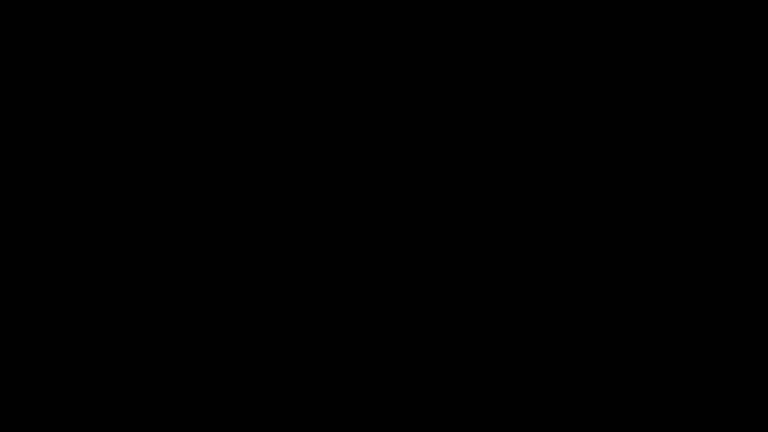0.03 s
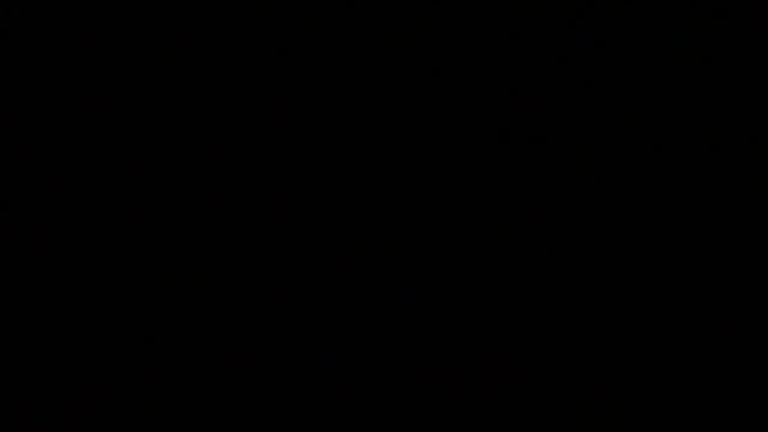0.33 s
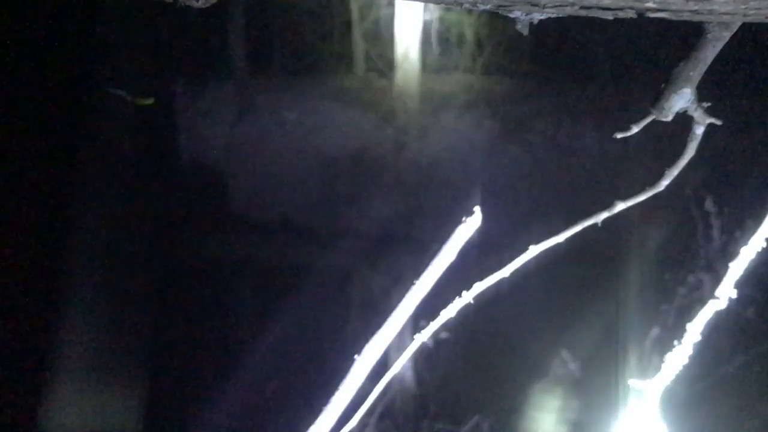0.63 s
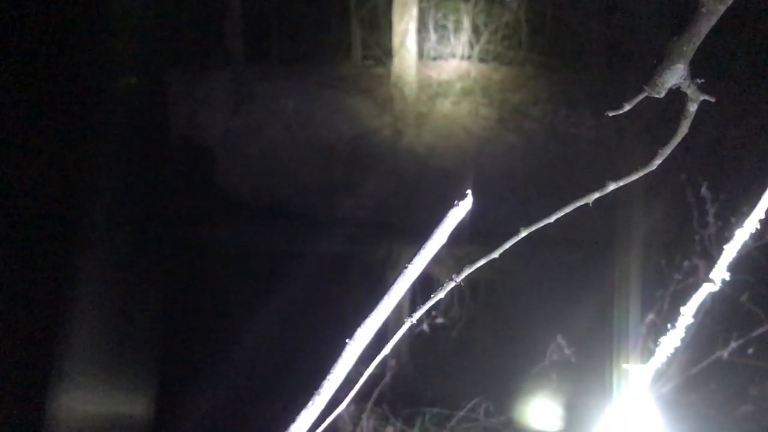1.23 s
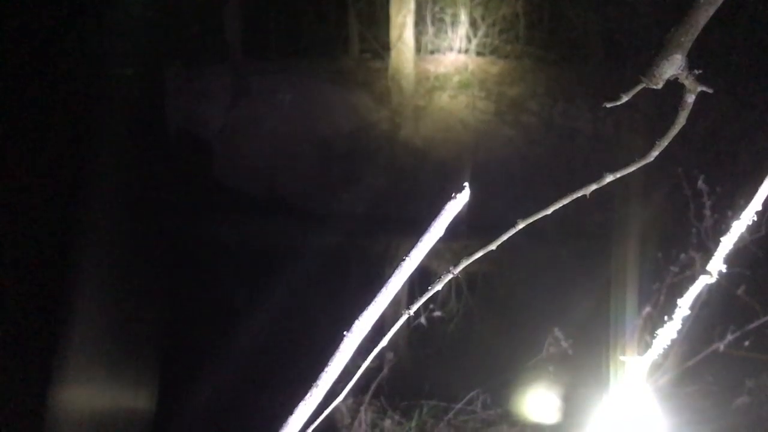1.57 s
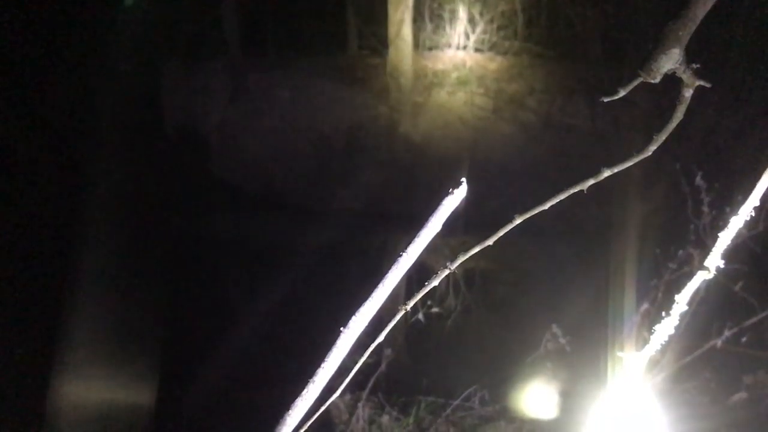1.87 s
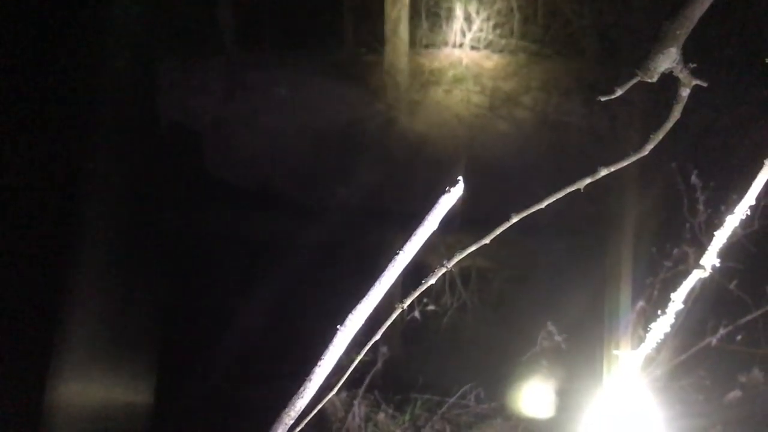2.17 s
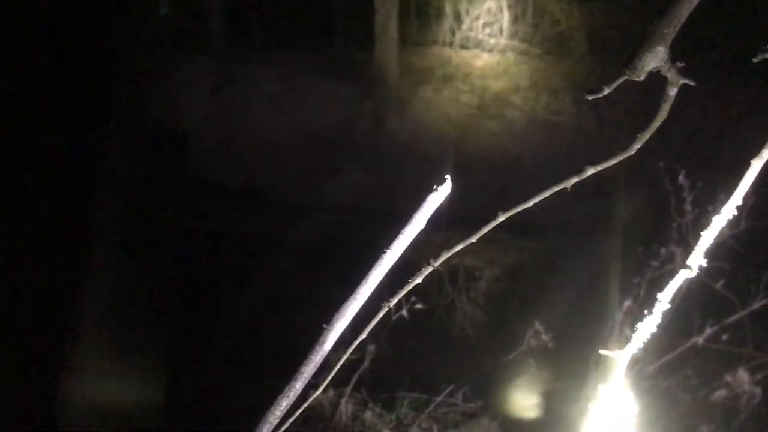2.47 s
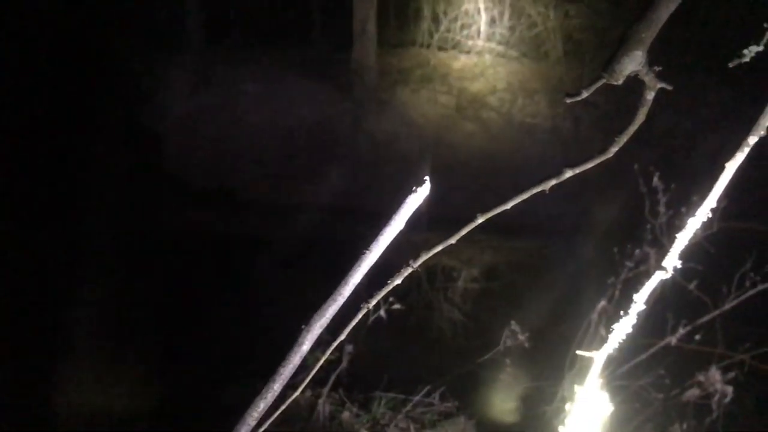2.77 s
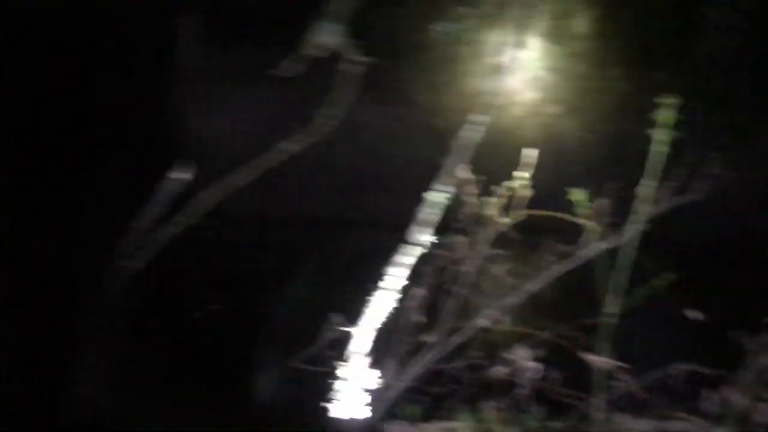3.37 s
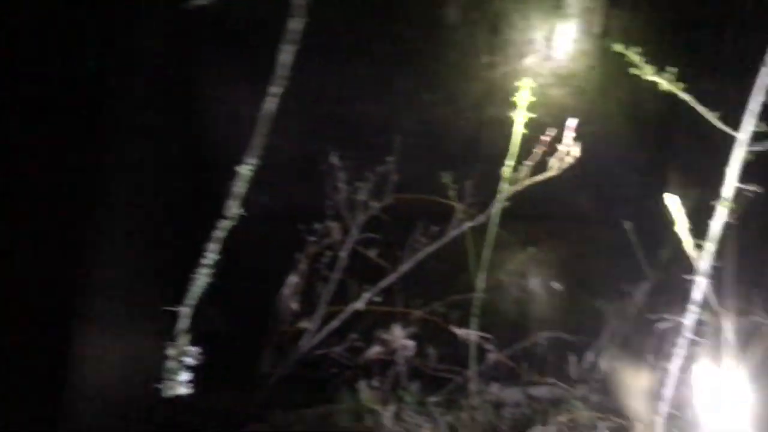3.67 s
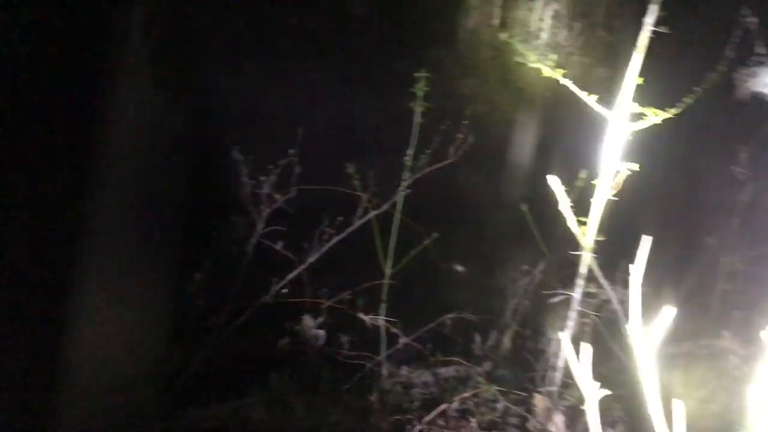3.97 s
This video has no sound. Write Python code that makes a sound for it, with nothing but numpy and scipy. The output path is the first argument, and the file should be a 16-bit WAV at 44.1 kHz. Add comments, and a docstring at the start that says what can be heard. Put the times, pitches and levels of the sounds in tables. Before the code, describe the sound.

A quick burst of high, raspy coyote yips and a cracking howl rings on among the trees at night. Then soft bumps, leaf rustles and small twig snaps sound close to the microphone, above a quiet low rumble.

```python
"""A wood at night, over low rumble and faint hiss. Coyotes open with a high yip, a whimper and a
falling yelp, as one thump and one twig sound close by. A bark follows, then a breaking howl with a
low whine under it and a thin whistle on top. Each voice is a gliding pitch with raspy overtones
shaped by the throat, and rings on among the trees for two seconds. As the echo fades, someone moves
near the microphone: rustling brush, snapping twigs, soft thumps and scuffs."""
import sys
import numpy as np
from scipy import signal
from scipy.fft import rfft, irfft
from scipy.io import wavfile

SR = 44100
rng = np.random.default_rng(int(sys.argv[2]) if len(sys.argv) > 2 else 0)


def bounce(signal):
    """Save signal as a 16-bit WAV file at the path given by the first command-line argument."""
    frames = np.transpose(np.atleast_2d(signal))
    limited = np.clip(frames, -1, 1)
    pcm = np.round(limited * 32767).astype(np.int16)
    wavfile.write(sys.argv[1], SR, pcm)


N = 176400
LEAD = SR // 4   # pre-roll: the first call is already under way
TIME = np.arange(-LEAD, N) / SR

# The six calls. Each row: time in seconds, pitch in Hz, fundamental in dB, overtones in dB before
# the throat, brightness in dB gained over the octave above 1400 Hz, period doubling from 0 to 1.
HIGH_YIP = [(-.15, 1250, -20, -50.5, -6, 0), (0, 1332, -33, -19, -4.5, 0.06),
            (.033, 1362, -18, -23, -6.5, 0.02), (.047, 1333, -35, -24.5, -3, 0),
            (.058, 1180, -35.5, -30, -4, 0.2), (.07, 950, -44, -37.5, 5, 1)]
RISING_WHIMPER = [(.005, 767, -49.5, -64.5, 0, 0.0086), (.039, 905, -36, -59.5, 0.013, 0),
                  (.079, 1000, -46, -63.5, 0.016, 0), (.135, 968, -39.5, -61, 0, 0)]
FALLING_YELP = [(.057, 1441, -24.5, -33.5, -14, 0), (.075, 1367, -37, -22.5, -2, 0.0062),
                (.099, 1198, -35.5, -27.5, -6.5, 0), (.125, 1088, -43, -35, -5, 0),
                (.14, 903, -51.5, -48, 0.5, 0), (.175, 579.5, -49, -50, -1.5, 0.0078),
                (.201, 527, -45.5, -49, -1, 0), (.27, 366, -53, -54.5, -8.5, 0.0096)]
BARK = [(.298, 607, -59, -40.5, 6, 0.96), (.308, 606.5, -49, -43.5, 11, 0.44),
        (.322, 648.5, -54, -28, 10, 0), (.338, 692, -39.5, -29.5, 5, 0.96), (.36, 715.6, -50, -22, 2, 0.22),
        (.385, 707.7, -46, -29.5, 3, 0.23), (.402, 696, -68, -38.5, 3, 0)]
BREAKING_HOWL = [(.503, 658, -64, -30.5, -11, 0.55), (.526, 679.3, -52, -19.5, -8, 0),
                 (.543, 694.4, -45, -23, -14, 0.37), (.565, 725, -48, -18, -12, 0),
                 (.578, 699, -46, -23, -12.5, 0.043), (.588, 706, -40.5, -25, -13.5, 0.062),
                 (.601, 713, -37, -29.5, -21.5, 0), (.613, 699, -49.5, -19.5, -15.5, 0.15),
                 (.626, 889, -29, -36.5, -2.5, 0.081), (.664, 919, -26, -35, 6.5, .15),
                 (.708, 932.3, -31.5, -34, 0, 0.53), (.73, 936.2, -24.5, -36, 6, .05),
                 (.772, 914.3, -23.5, -32.5, -5.5, .05), (.782, 929, -42.5, -20, -20, 0.081),
                 (.793, 664, -48.5, -33.5, 3.5, 0.079), (.82, 677, -74, -37, 13, 0),
                 (.848, 625.7, -59, -33.5, -4, 0.27), (.862, 576, -81, -39.5, 0, .2)]
LOW_WHINE = [(0.542, 341.8, -55, -68.5, 0.044, 0), (0.601, 406, -53.5, -59.5, 0.0093, 0.0024),
             (.628, 558, -44.5, -55, 0.00083, 0.016), (0.661, 632, -51, -54, 0.032, 0.012),
             (0.701, 500, -62.5, -77.5, 0.0077, 0)]
# How throat and mouth colour the overtones. Each row: frequency in Hz, gain in dB.
THROAT = [(700, -24), (1050, 1.5), (1400, 2.5), (1850, 5), (2120, -4), (2450, -3), (2780, -12.5),
          (3050, -28), (3350, -30), (3700, -46), (4100, -44), (4650, -48.5), (5100, -50), (5680, -44.5),
          (6400, -44), (7600, -49.5), (8600, -56.5), (10000, -82), (13000, -67.5), (16000, -79)]
# The wood's echo. Each row: frequency in Hz, gain in dB, seconds to fall by 60 dB.
WOOD = [(400, -2.5, 2.1), (756, -2.5, 3.4), (1020, -17.5, 3.3), (1300, -3.5, 3.03), (1900, -14.5, 2.0),
        (2700, -8, 2.7), (4000, 3.5, 1.1), (6000, -7, 1.1), (11970, -31, .5)]
# Tone of the rumble and of the hiss. Each row: frequency in Hz, relative level in dB.
RUMBLE_COLOUR = [(20, -17.5), (40, -10.5), (62, -3.5), (88, 2), (125, -10), (200, -18), (320, -21),
                 (800, -25.5), (2500, -31.5), (5000, -55.5)]
HISS_COLOUR = [(2500, -9.5), (4200, -8.5), (6300, -13), (8000, -16.5), (9700, -15), (10500, -22.5),
               (12000, -8), (14300, -11.5), (16000, 1), (17200, -7.5)]
# Their fader moves. Each row: time in seconds, level in dB.
RUMBLE_LEVEL = [(0, -53.5), (.47, -54.5), (.7, -54.5), (1.4, -57.5), (2.2, -58.5), (2.7, -56.5), (3.1, -52),
                (3.5, -54.5), (4, -62)]
HISS_LEVEL = [(1.5, -67.5), (1.57, -62.5), (1.68, -65), (1.9, -66), (2.05, -68.5), (4, -67.5)]
# Soft bumps. Each row: start in seconds, boom gain in dB, knock gain in dB, boom pitch in Hz.
THUMPS = [(.058, -41.5, -42, 94.6), (1.471, -47.5, -50, 91.94), (2.447, -54, -43, 89.3),
          (2.466, -27, -38.5, 80), (2.62, -33, -50.5, 79.2), (2.813, -40, -43.5, 100),
          (2.839, -25.5, -34.5, 105.7), (2.887, -34, -46, 89.4), (3.036, -35, -44.5, 86),
          (3.091, -48, -39, 95), (3.128, -39, -40, 107), (3.205, -30.5, -41.5, 94.3),
          (3.433, -43.5, -75.5, 88.4), (3.763, -41.5, -53, 66), (3.896, -37, -50, 70),
          (3.946, -41, -41, 81.4)]
# The knock's resonances. Each row: pitch in Hz before detuning, gain in dB, seconds to fall by 60 dB.
KNOCK_MODES = [(179, 5, 0.066), (245, 2.5, 0.024), (353, -3.5, 0.056), (566, -31.5, 0.015),
               (895, -20.5, 0.029)]
# Breaking twigs. Each row: start in seconds, level in dB, ring pitch in Hz.
SNAPS = [(0.111, -48, 12100), (1.722, -51.5, 3450), (1.887, -53, 5610), (2.728, -52.5, 3600),
         (2.811, -54, 795), (3.071, -56, 990), (3.089, -48, 1270), (3.112, -53, 1390), (3.13, -49, 1090),
         (3.283, -55, 4600), (3.48, -50, 1500), (3.611, -36, 2970), (3.73, -53, 4000), (3.91, -49.5, 1500),
         (3.935, -51.5, 4000)]
# The tone above the howl. Each row: time in seconds, pitch in Hz, level in dB.
THIN_WHISTLE = [(.57, 5580, -72), (.66, 5750, -64), (.725, 5790, -62.5), (.79, 5658, -66), (.86, 5766, -72)]
# Swells of the brush. Each row: time in seconds, level in dB before the boost.
RUSTLE_LEVEL = [(1.5, -92), (1.55, -88), (1.75, -81), (1.9, -68), (2.1, -79), (2.4, -78), (2.5, -74.5),
                (2.72, -71), (2.92, -76), (3.17, -65), (3.35, -74), (3.52, -74.5), (3.59, -60),
                (3.7, -75.5), (3.82, -76.5), (3.95, -69)]
# Strokes along the leaves. Each row: middle in seconds, half-length in seconds, peak level in dB.
SCUFFS = [(2.477, 0.023, -56.5), (2.853, 0.042, -64), (3.109, 0.027, -44), (3.97, 0.043, -61)]
# Tone of the twigs, the leaves and the scuffs. Each row: frequency in Hz, relative level in dB.
SNAP_COLOUR = [(200, -10), (900, 11), (2000, 2), (5200, -4.5), (7000, -11), (10000, -15.5), (15000, -16)]
RUSTLE_COLOUR = [(200, -9.5), (500, -7.5), (1500, -2.5), (2700, -5.5), (4200, -9), (6000, -11.5),
                 (8000, -23), (11000, -25), (15000, -15)]
SCUFF_COLOUR = [(120, 1.5), (250, -6), (400, 1), (650, -22), (950, -11), (1400, -21.5), (2400, -20),
                (4000, -35), (9000, -59)]


def from_db(db):
    """Decibels to gain."""
    return 10 ** (np.asarray(db) / 20)


def unit_rms(x):
    """Scale to rms 1."""
    return x / np.sqrt(np.mean(x ** 2) + 1e-20)


def in_time(rows):
    """Each column of a curve, sample by sample."""
    times, *columns = np.transpose(rows)
    return [np.interp(TIME, times, column) for column in columns]


def at_hz(points, hz, column=1):
    """Read a column of a spectrum on a log-frequency axis."""
    table = np.array(points)
    return np.interp(np.log(np.maximum(hz, 1)), np.log(table[:, 0]), table[:, column])


def white():
    """White noise."""
    return rng.standard_normal(len(TIME))


def drift(hz):
    """A random wobble of rms 1, mostly slower than hz."""
    pole = np.exp(-2 * np.pi * hz / SR)
    return unit_rms(signal.lfilter([1], [1, -2 * pole, pole * pole], white()))


def coloured(x, spectrum):
    """Equalise a sound, with a curve that keeps the power of white noise."""
    gain = from_db(at_hz(spectrum, np.arange(len(x) // 2 + 1) * SR / len(x)))
    return irfft(rfft(x) * unit_rms(gain), len(x))


def jittered(hz):
    """Give a pitch curve a fast 0.4 % tremble."""
    return hz * (1 + .004 * drift(120))


def coyote(rows, rasp_db, rasp_width_hz=230, fade_s=.006):
    """A fundamental and overtones shaped by the throat; period doubling puts lines between them."""
    start, end = rows[0][0], rows[-1][0]
    on = (TIME > start) & (TIME < end)
    pitch, *curves = in_time(rows)
    hz = jittered(pitch)[on]
    fundamental_db, overtone_db, bright_db, doubling = [curve[on] for curve in curves]
    phase = 2 * np.pi * np.cumsum(hz) / SR
    voice = from_db(fundamental_db) * np.sin(phase)
    rasp_filter = signal.butter(4, rasp_width_hz, fs=SR, output="sos")
    for multiple in np.arange(1.5, 22, .5):
        partial_hz = multiple * hz
        tilt_db = bright_db * np.clip(np.log2(partial_hz / 1400), 0, 1)
        gain = from_db(overtone_db + at_hz(THROAT, partial_hz) + tilt_db)
        if multiple % 1:
            gain *= doubling
        # Rasp is turbulence riding on each overtone, rougher on the high ones.
        depth = from_db(rasp_db) * np.sqrt(multiple / 2) * (1 + np.minimum(partial_hz / 5090, 1) ** 2)
        turbulence = unit_rms(signal.sosfilt(rasp_filter, rng.standard_normal((2, len(hz)))))
        rasp_sin, rasp_cos = depth * turbulence
        angle = multiple * phase + 2 * np.pi * rng.random()
        voice += gain * ((1 + rasp_sin) * np.sin(angle) + rasp_cos * np.cos(angle))
    fade = np.clip(np.minimum(TIME[on] - start, end - TIME[on]) / fade_s, 0, 1)
    shimmer = from_db(.6 * drift(86)[on])
    out = np.zeros(len(TIME))
    out[on] = np.sqrt(2) * voice * fade * shimmer
    return out


def pack():
    """Six overlapping calls: the howl is clearest; whimper, yelp and whine are hoarsest."""
    return (coyote(HIGH_YIP, rasp_db=-16.5)
            + coyote(RISING_WHIMPER, rasp_db=-9)
            + coyote(FALLING_YELP, rasp_db=-9)
            + coyote(BARK, rasp_db=-16.5)
            + coyote(BREAKING_HOWL, rasp_db=-19)
            + coyote(LOW_WHINE, rasp_db=-9))


def trunk_scatter():
    """Noise with no deep notches in time or pitch, like scatter from very many trunks."""
    noise = white()
    for _ in range(2):
        cells = signal.stft(noise, nperseg=4096)[2]
        levelled = np.exp(1j * np.angle(cells))
        noise = signal.istft(levelled, nperseg=4096)[1][:len(TIME)]
    return unit_rms(noise)


def wood_echo(voices, near_db=10, near_t60_s=.35, build_s=.04):
    """Scatter from near trunks dies quickly; the far wood rings on, longest near 1 kHz, and flutters."""
    t = np.arange(len(TIME)) / SR
    edges_hz = 250 * 2 ** (np.arange(13) / 2)   # half-octave bands
    scatter = trunk_scatter(), trunk_scatter()
    response = 0
    for k, (low, high) in enumerate(zip(edges_hz, edges_hz[1:])):
        hz = np.sqrt(low * high)
        far = unit_rms(from_db(-60 * t / at_hz(WOOD, hz, column=2)))
        near = from_db(near_db) * unit_rms(from_db(-60 * t / near_t60_s))
        bandpass = signal.butter(2, [low, high], "band", fs=SR, output="sos")
        band = signal.sosfilt(bandpass, scatter[k % 2])
        response += band * from_db(at_hz(WOOD, hz)) * np.hypot(far, near)
    response *= (1 - np.exp(-t / build_s)) / np.sqrt(len(t))
    flutter = from_db(1.6 * drift(9))
    return signal.fftconvolve(voices, response)[:len(voices)] * flutter


def rumble():
    """A bed of low noise whose level wavers."""
    level_db = in_time(RUMBLE_LEVEL)[0] + 2 * drift(7.2)
    return from_db(level_db) * coloured(white(), RUMBLE_COLOUR)


def hiss(pulse_hz=60):
    """The microphone's hiss, with a fine electrical flutter."""
    flutter = 1 + .5 * np.cos(np.pi * pulse_hz * TIME) ** 20
    return from_db(in_time(HISS_LEVEL)[0]) * flutter * coloured(white(), HISS_COLOUR)


def thumps(attack_s=.0098, boom_t60_s=.12):
    """Each bump starts with a dull knock and swells into a low boom."""
    out = np.zeros(len(TIME))
    t = np.arange(SR // 3) / SR
    swell = 1 - np.exp(-(t / attack_s) ** 2)
    for start, boom_db, knock_db, boom_hz in THUMPS:
        boom = 2 * from_db(boom_db - 60 * t / boom_t60_s) * swell * np.sin(2 * np.pi * boom_hz * t)
        knock = 0
        for k, (hz, db, t60) in enumerate(KNOCK_MODES):
            detuned_hz = hz * rng.uniform(.807, 1.12)
            decay = from_db(knock_db + db - 60 * t / t60)
            knock += (-1) ** k * decay * np.sin(2 * np.pi * detuned_hz * t)
        i = LEAD + int(start * SR)
        out[i:i + len(t)] += (boom + knock)[:len(out) - i]
    return out


def twig_snaps(t60_s=.024, ring_db=17.5):
    """Each twig gives a short crack that rings broadly at its own pitch."""
    crack = coloured(white(), SNAP_COLOUR)
    out = 0
    for start, db, hz in SNAPS:
        ring = unit_rms(signal.lfilter(*signal.iirpeak(hz, Q=.75, fs=SR), crack))
        decay = (TIME >= start) * from_db(-60 * np.clip((TIME - start) / t60_s, 0, 3))
        out += from_db(db) * decay * unit_rms(crack + from_db(ring_db) * ring)
    return out


def whistle():
    """A faint, nearly pure tone that arches over the howl."""
    hz, db = in_time(THIN_WHISTLE)
    on = (TIME > THIN_WHISTLE[0][0]) & (TIME < THIN_WHISTLE[-1][0])
    phase = 2 * np.pi * np.cumsum(jittered(hz)) / SR
    return np.sqrt(2) * on * from_db(db) * np.sin(phase)


def leaf_crackle(clicks_per_s=1900, spread_db=4.5):
    """Dense tiny clicks of very uneven size, softened with smooth noise."""
    hits = rng.random(len(TIME)) < clicks_per_s / SR
    polarity = np.sign(white())
    size_db = spread_db * np.minimum(rng.exponential(1, len(TIME)), 5)
    clicks = unit_rms(hits * polarity * from_db(size_db))
    return unit_rms(clicks + .83 * white())


def rustle(boost_db=5.5):
    """Leaves crackle in swells as someone moves through the brush."""
    return from_db(in_time(RUSTLE_LEVEL)[0] + boost_db) * coloured(leaf_crackle(), RUSTLE_COLOUR)


def scuffs():
    """Something scuffs along the leaves in short, dark strokes."""
    strokes = sum(from_db(db) * np.exp(-.5 * ((TIME - middle) / width) ** 2)
                  for middle, width, db in SCUFFS)
    return strokes * coloured(leaf_crackle(), SCUFF_COLOUR)


def scene():
    """The pack with its echo, the dry sounds close by and the noise bed, in mono."""
    voices = pack() + whistle()
    echo = wood_echo(voices)
    close_by = thumps() + twig_snaps() + rustle() + scuffs()
    mix = voices + echo + close_by + rumble() + hiss()
    return mix[None, LEAD:]


def record(dry):
    """A steep low-pass takes off the top above 17.2 kHz."""
    return signal.sosfilt(signal.ellip(10, .1, 80, 17200, fs=SR, output="sos"), dry)


dry = scene()
out = record(dry)
bounce(out)
```